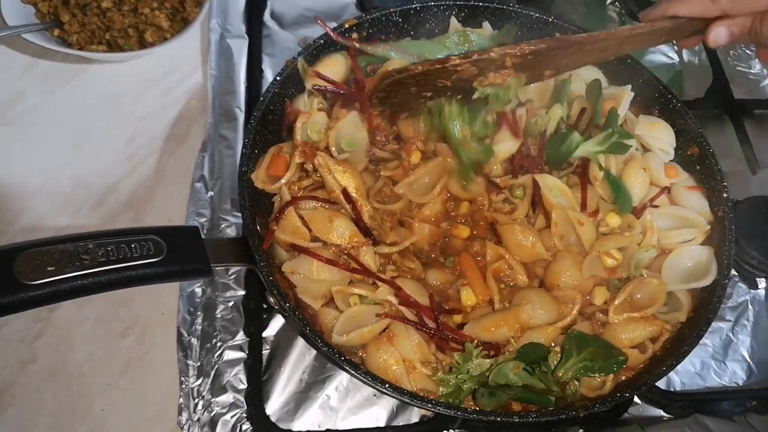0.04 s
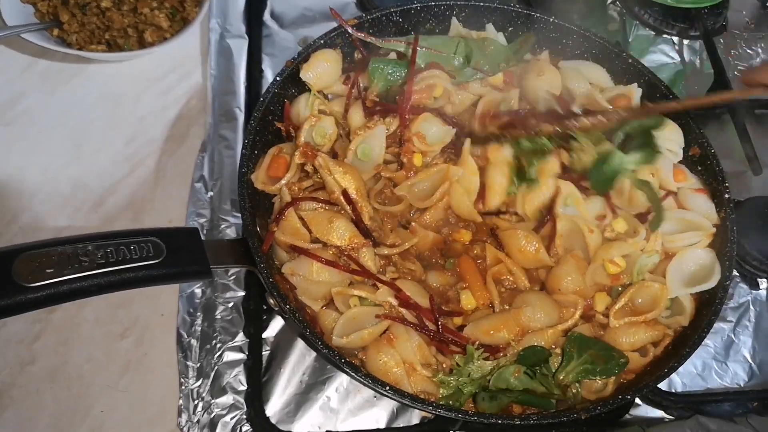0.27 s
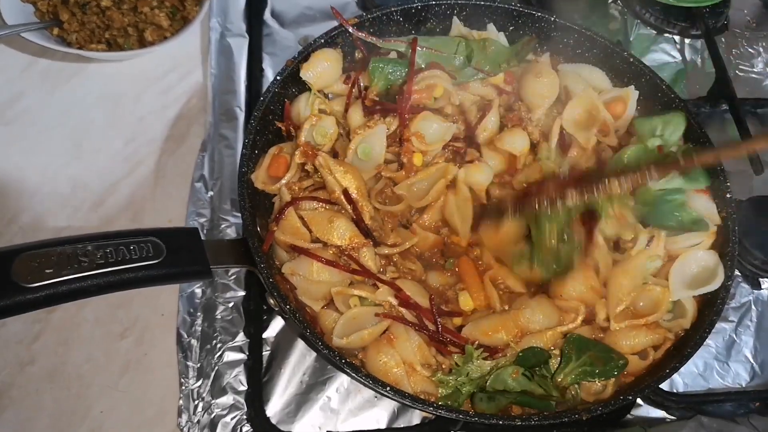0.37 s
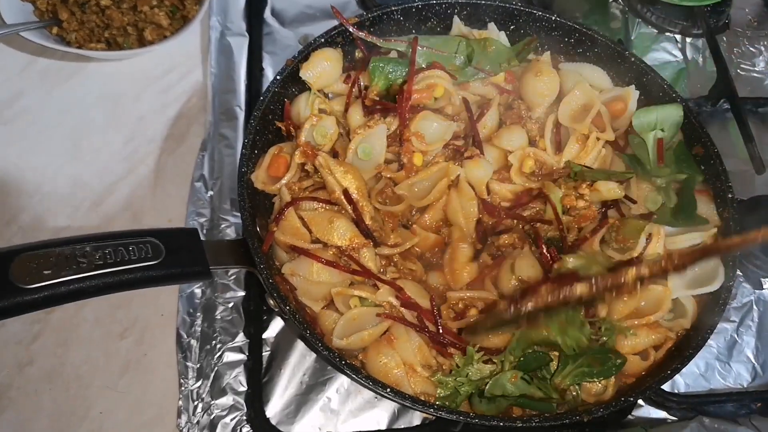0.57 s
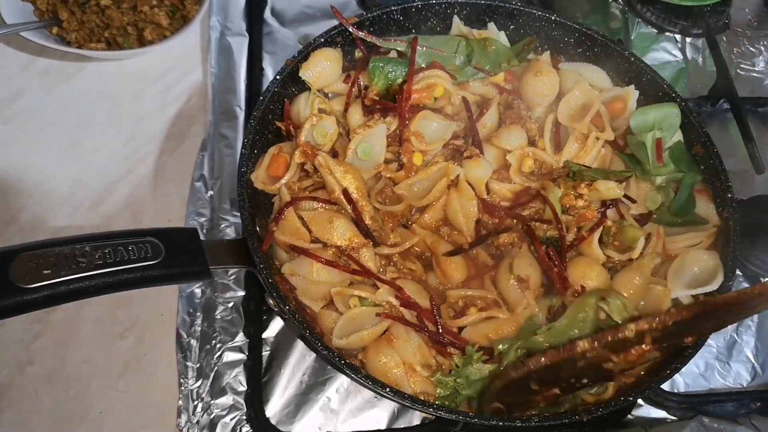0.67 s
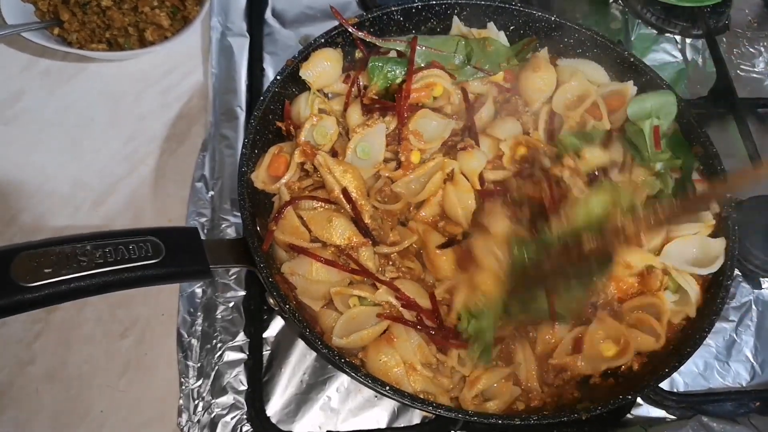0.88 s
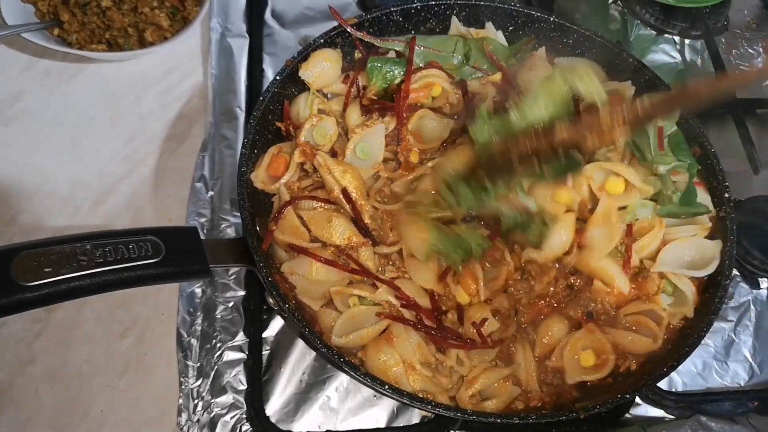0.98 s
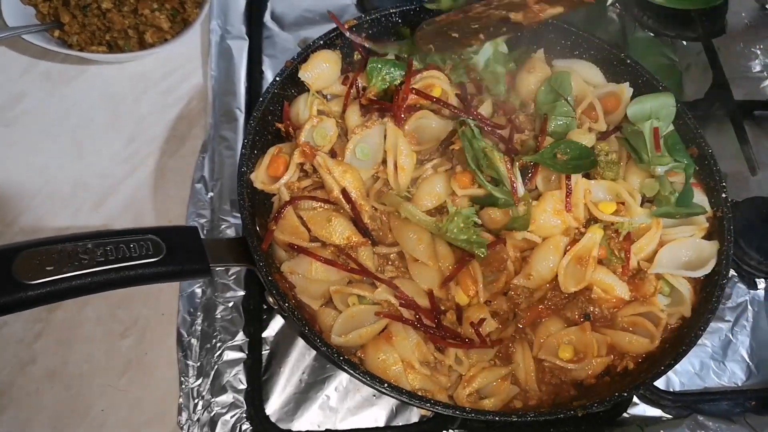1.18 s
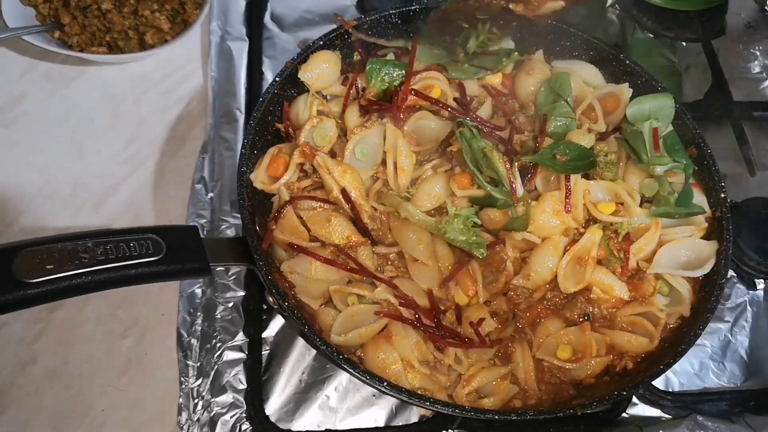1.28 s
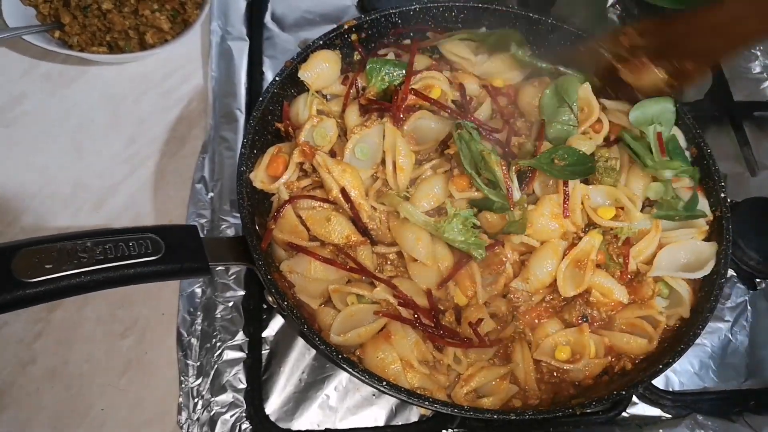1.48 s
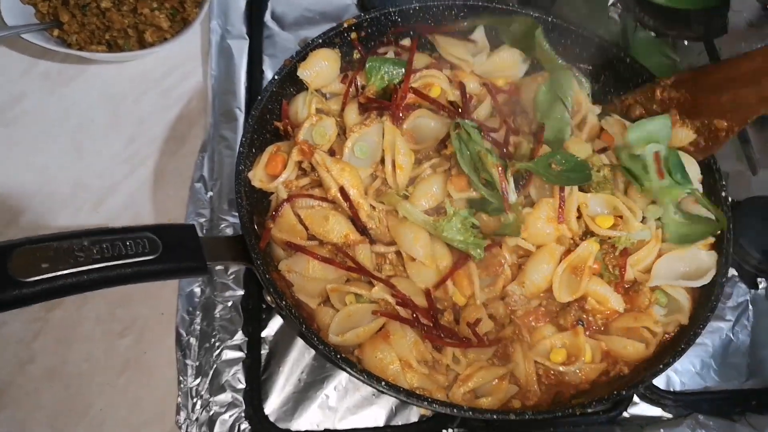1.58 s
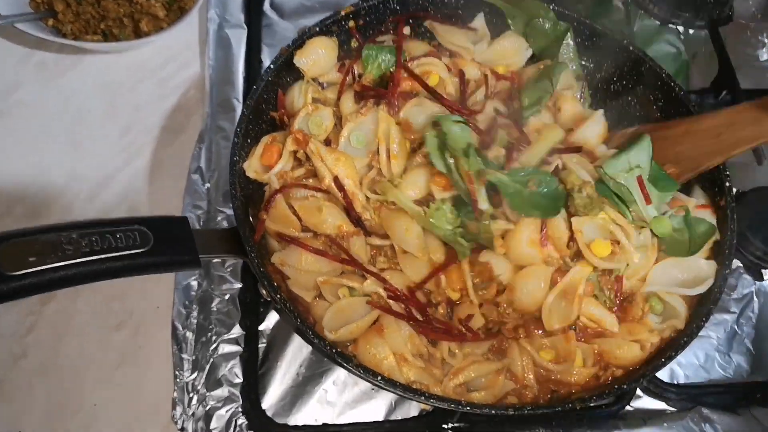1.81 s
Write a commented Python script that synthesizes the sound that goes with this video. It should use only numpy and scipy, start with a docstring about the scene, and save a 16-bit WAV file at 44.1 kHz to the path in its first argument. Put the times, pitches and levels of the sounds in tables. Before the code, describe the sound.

A wooden spoon stirs saucy pasta in a frying pan, close by. At 0.2 seconds it taps the rim and knocks sharply, the pan thudding on the stove as the sauce squelches. A duller knock at 0.6 leads into wet pops until 0.9. From 1.3 comes another squelching stroke with a knock, a light scrape and a soft rumble around 1.5. A faint hum and fan-like drone continue throughout.

```python
"""Over a mains hum and a low fan-like drone, a wooden spoon taps a frying pan and stirs saucy pasta.
It is close, in a small kitchen. The sauce squelches, pops and snaps with each stroke, the spoon
knocks the food-damped pan, and the shoved pan thuds on the stove top.
Near the end the spoon drags along the pan's wall and a soft rumble passes."""
import sys
import numpy as np
from scipy import signal
from scipy.fft import rfft, irfft, next_fast_len
from scipy.io import wavfile
from scipy.ndimage import uniform_filter1d

SR = 44100
rng = np.random.default_rng(int(sys.argv[2]) if len(sys.argv) > 2 else 0)


def digitize_waveform(pressure):
    """Quantize a signal to 16-bit integers and store it at the path in sys.argv[1].

    Rows of a 2-D input are taken as channels; values are limited to [-1, 1].
    """
    field = np.atleast_2d(pressure).T
    bounded = np.clip(field, -1, 1)
    quanta = np.round(bounded * 32767).astype(np.int16)
    wavfile.write(sys.argv[1], SR, quanta)


N = 81585
T = np.arange(N) / SR


def undb(db):
    """Decibels to gain."""
    return 10 ** (np.asarray(db) / 20)


def unit(x):
    """Scale to rms 1."""
    return x / np.sqrt(np.mean(x ** 2))


def curve(rows):
    """Gain over time from (time_s, gain_db) points."""
    return undb(np.interp(T, *np.array(rows).T))


def colour(x, points):
    """Filter by (freq_hz, gain_db) points."""
    hz, db = np.array(points).T
    size = next_fast_len(x.shape[-1] + 1024, True)
    freqs = np.maximum(np.fft.rfftfreq(size, 1 / SR), 1)
    gain = undb(np.interp(np.log(freqs), np.log(hz), db))
    return irfft(rfft(x, size) * gain, size)[..., :x.shape[-1]]


def butter(x, order, hz, kind="low"):
    """Butterworth filter."""
    return signal.sosfilt(signal.butter(order, hz, kind, fs=SR, output="sos"), x)


def noise(points, shape=N):
    """Coloured noise of rms 1."""
    return unit(colour(rng.standard_normal(shape), points))


def balance(balance_db):
    """Stereo gains; balance_db is left minus right."""
    return undb(np.array([[balance_db], [-balance_db]]) / 2)


def add(out, x, start_s, gain_db, balance_db=0):
    """Mix a mono event into stereo."""
    i = min(max(int(start_s * SR), 0), N - 1)
    out[:, i:i + len(x)] += x[:N - i] * undb(gain_db) * balance(balance_db)


def decay(t, t60_s):
    """Envelope that falls 60 dB in t60_s."""
    return np.exp(-np.log(1000) * t / t60_s)


def ring(modes, weights=None, detune=0.0071):
    """Decaying sines of a struck body, slightly detuned by the shifting load."""
    t = T[:N // 3]
    body = np.zeros(len(t))
    for k, (hz, db, t60_s) in enumerate(modes):
        gain = undb(db) * (1 if weights is None else weights[k])
        hz *= 1 + detune * rng.standard_normal()
        body += (-1) ** k * gain * np.sin(2 * np.pi * hz * t) * decay(t, t60_s)
    return body


def struck(modes, centre_hz, spread_oct):
    """Ring of peak 1 from a blow that favours the modes around centre_hz."""
    offset_oct = np.log2(np.array(modes)[:, 0] / centre_hz)
    body = ring(modes, np.exp(-.5 * (offset_oct / spread_oct) ** 2))
    return body / np.abs(body).max()


def kitchen(x, wet_db, low_t60_s=0.25, treble_t60_s=0.14, gap_s=0.00073):
    """Add a short diffuse echo, different in each ear; its treble dies first."""
    t = T[:N // 3]
    hiss = rng.standard_normal((2, len(t)))
    low = butter(hiss, 1, 3000)
    tail = (low * decay(t, low_t60_s) + (hiss - low) * decay(t, treble_t60_s)) * (t > gap_s)
    tail /= np.sqrt(np.sum(tail ** 2, axis=1, keepdims=True))
    return x + undb(wet_db) * signal.fftconvolve(x, tail, axes=1)[:, :N]


def hum(pitch_hz=99.2, rms_db=-55.5):
    """Mains hum: one steady sine."""
    return np.sqrt(2) * undb(rms_db) * np.sin(2 * np.pi * pitch_hz * T)


# Drone spectrum: freq_hz, gain_db
DRONE_SPECTRUM = [(30, -7), (60, 1), (110, 4.5), (160, -2.5), (215, -8.5), (280, 3), (350, -11.5),
                  (500, -22), (750, -36), (1500, -62), (4000, -85)]


def drone(level_db=-57.5, width=0.12):
    """Low fan-like noise, nearly mono."""
    mid, side = noise(DRONE_SPECTRUM), noise(DRONE_SPECTRUM)
    return undb(level_db) * np.array([mid + width * side, mid - width * side])


# Simmer spectrum: freq_hz, gain_db
SIMMER_SPECTRUM = [(200, 17), (700, 11.5), (1200, 8), (1900, 8), (3000, -23.5), (6000, -14), (9500, -39.5),
                   (12000, -8.5), (15500, -10)]


def simmer(gain_db=-70.5):
    """The sauce simmers: faint, wide, steady noise."""
    shared, left, right = (noise(SIMMER_SPECTRUM) for _ in range(3))
    return undb(gain_db) * (.5 * shared + np.array([left, right]))


# Push of the spoon on the food: time_s, gain_db
STIR_EFFORT = [(0, -70.5), (.07, -72.5), (.13, -65.5), (.195, -64.5), (.23, -55), (.31, -57.5), (.37, -68),
               (.45, -77), (.62, -75.5), (.685, -56), (.74, -63), (.8, -57), (.88, -57.5), (.96, -72),
               (1.04, -72.5), (1.14, -72.5), (1.21, -69), (1.3, -69), (1.335, -59.5), (1.42, -58),
               (1.5, -59), (1.57, -65.5), (1.6, -57.5), (1.66, -60.5), (1.72, -66.5), (1.85, -66.5)]
# Squelch spectrum: freq_hz, gain_db
SQUELCH_SPECTRUM = [(400, -14), (750, -20), (1200, -7), (1900, 0), (2700, -1.5), (4000, -5.5), (6200, -9.5),
                    (8000, -8), (9800, -11.5), (11500, -23), (15500, -26)]
# Squelch position by frequency: freq_hz, balance_db
SQUELCH_BALANCE = [(500, -3.5), (2200, 1), (4500, 4), (8000, 0.5), (14000, -5.5)]


def squelch(grains_per_s=2200, decay_cycles=5.4, spread_db=2.5, swing_db=15.5, smear_db=1.5, trim_db=-3.5):
    """A crowd of tiny wet grains over a soft smear, as loud as the spoon pushes."""
    smear = noise(SQUELCH_SPECTRUM, (2, N))
    when, pitch, size, side = rng.random((int(grains_per_s * N / SR), 4)).T[..., None]
    hz = 900 + 14000 * pitch ** 1.5
    samples = np.arange(160)
    cycles = samples * hz / SR
    gain = np.sqrt(hz) * undb(-spread_db * np.log(1 - .99 * size))  # many weak, few strong
    grains = gain * np.sin(2 * np.pi * cycles) * np.exp(-cycles / decay_cycles)
    index = ((when * N).astype(int) + samples).ravel()
    side_db = swing_db * (2 * side - 1)
    crowd = np.array([np.bincount(index, (grains * undb(s * side_db)).ravel(), N)[:N] for s in (1, -1)])
    texture = unit(colour(crowd, SQUELCH_SPECTRUM)) + undb(smear_db) * smear
    stirred = texture * curve(STIR_EFFORT) * undb(trim_db)
    ear_eqs = [[(freq, s * db / 2) for freq, db in SQUELCH_BALANCE] for s in (1, -1)]
    return np.array([colour(ear, eq) for ear, eq in zip(stirred, ear_eqs)])


# Light taps on the rim: start_s, peak_db, centre_hz, spread_oct, balance_db
RIM_TAPS = [(0.09, -49.5, 2264, 0.095, 15), (.161, -35.5, 1400, 1.3, 3.5), (1.793, -57.5, 1120, 0.49, 9),
            (1.8382, -55.5, 1900, 0.19, 6)]
# Rim modes: pitch_hz, gain_db, t60_s
RIM_MODES = [(1030, 3, .035), (1210, -1, 0.034), (1888, -2.5, 0.076), (2357, -7.5, 0.029),
             (2650, -2.5, 0.048)]


def taps():
    """The spoon's handle touches the rim, which rings briefly."""
    out = np.zeros((2, N))
    for start_s, peak_db, centre_hz, spread_oct, balance_db in RIM_TAPS:
        add(out, struck(RIM_MODES, centre_hz, spread_oct), start_s, peak_db, balance_db)
    return kitchen(out, wet_db=-5.5)


# Sticky films breaking: start_s, relative_db, centre_hz, balance_db
FILM_SNAPS = [(0.12, -59, 9200, -7), (0.176, -45.5, 8360, -6), (0.3, -43.5, 5440, 4), (0.326, -47, 7460, 2),
              (.404, -56.5, 7700, -6.5), (.689, -46, 5960, -2), (.8362, -48, 7240, 1),
              (0.8721, -42, 7600, 4), (1.333, -49, 8450, -8), (1.671, -48, 7600, 9), (1.7647, -45, 3450, 7),
              (1.7624, -46.5, 12000, -7)]


def snaps(decay_s=0.0033, width_oct=0.57, trim_db=-6.5):
    """Films of sauce pull apart in bright bursts of noise."""
    out, t = np.zeros((2, N)), T[:N // 40]
    for start_s, relative_db, centre_hz, balance_db in FILM_SNAPS:
        band_hz = centre_hz * 2 ** (width_oct * np.array([-.5, .5]))
        burst = unit(butter(rng.standard_normal(len(t)), 2, band_hz, "band"))
        add(out, burst * np.exp(-t / decay_s), start_s, relative_db + trim_db, balance_db)
    return out


# Pockets of sauce opening: start_s, gain_db, pitch_hz, balance_db
SAUCE_POPS = [(.1299, -42, 2040, 4), (.226, -38, 1900, 0), (0.359, -55.5, 1280, 11), (0.39, -51, 1520, 1),
              (0.6903, -55, 2600, 12), (0.7114, -46, 3080, 2), (0.7626, -36.5, 3240, 5),
              (0.7993, -34.5, 1680, -2), (0.8323, -40.5, 1800, -3), (0.849, -50, 2700, 1),
              (0.8719, -28.5, 2400, 0.5), (0.8812, -38.5, 1750, -4), (1.1045, -47, 4170, 4),
              (1.4045, -34.5, 1790, -6), (1.4627, -38, 2120, 10), (1.555, -45.5, 3000, 16),
              (1.592, -45, 2450, 4.5), (1.622, -47, 1940, 11), (1.7392, -44.5, 2310, 12),
              (1.7635, -51, 1060, 2)]


def pops(decay_cycles=2.29, glide=0.047, rise_s=0.00029, spray_db=-11.5):
    """Each small cavity rings for a few cycles, rising as it opens, with a little spray."""
    out, t = np.zeros((2, N)), T[:N // 40]
    attack = 1 - np.exp(-t / rise_s)
    for start_s, gain_db, pitch_hz, balance_db in SAUCE_POPS:
        age = t * pitch_hz / decay_cycles  # in decay times
        tone = np.sin(2 * np.pi * decay_cycles * age * (1 + glide * age / 2)) * np.exp(-age)
        spray = uniform_filter1d(rng.standard_normal(len(t)) * np.exp(-age), size=3)
        add(out, (tone + undb(spray_db) * spray) * attack, start_s, gain_db, balance_db)
    return out


# Spoon blows on the pan: start_s, gain_db, cutoff_hz, balance_db
SPOON_KNOCKS = [(.2068, -20.5, 4040, 4), (0.2435, -42.5, 1990, -15), (0.2934, -35, 1180, 1.5),
                (0.625, -30, 930, 5), (1.3742, -32, 2680, 4.5)]
# Modes of the filled pan: pitch_hz, gain_db, t60_s
PAN_MODES = [(436.8, -15.5, 0.11), (560.6, -19, 0.2), (942, -13.5, 0.035), (1086, -13, 0.051),
             (1192, -11.5, 0.068), (1332, -6, 0.052), (1625, -0.5, .028), (1742, -0.5, 0.033),
             (1844, 2, 0.031), (2302, -10.5, 0.045), (2476, -5, 0.031), (2560, -6, 0.034),
             (2872, -14, 0.02), (5620, -14, 0.015)]
# Contact crack spectrum: freq_hz, gain_db
CRACK_SPECTRUM = [(300, 2), (700, -12), (1100, -9.5), (1800, -1.5), (3200, -10), (5500, -9), (9500, -9.5),
                  (12000, -32), (16000, -41)]


def knocks(crack_db=-7.5, crack_decay_s=0.0058, echo_s=0.0064, echo_db=-8.5):
    """Wood meets the pan: a crack and a short ring, duller when food cushions the blow."""
    out = np.zeros((2, N))
    for start_s, gain_db, cutoff_hz, balance_db in SPOON_KNOCKS:
        body = ring(PAN_MODES)
        crack = noise(CRACK_SPECTRUM, len(body)) * np.exp(-T[:len(body)] / crack_decay_s)
        blow = butter(body / np.abs(body).max() + undb(crack_db) * crack, 2, cutoff_hz)
        add(out, blow, start_s, gain_db, balance_db)
        wall_echo = butter(blow, 1, 2500)
        add(out, wall_echo, start_s + echo_s, gain_db + echo_db, 0.81 * balance_db)
    return kitchen(out, wet_db=-4)


# Pan thuds on its support: start_s, peak_db, centre_hz
PAN_THUDS = [(.209, -30.5, 254), (0.2213, -24, 98), (0.2408, -27.5, 239), (0.256, -30, 66.5),
             (0.291, -41.5, 150), (.312, -35.5, 65), (0.626, -29, 196), (.645, -29, 167),
             (0.676, -34.5, 169), (0.761, -48, 148), (.8, -56, 194), (1.345, -39.5, 167),
             (1.382, -34.5, 188), (1.41, -47, 296), (1.441, -44.5, 282), (1.707, -47, 62.4)]
# Stove top modes: pitch_hz, gain_db, t60_s
STOVE_MODES = [(49, -3, 0.27), (81, -5, 0.09), (112.7, 3, .19), (158.3, 0.5, 0.12), (189.1, -3.5, 0.23),
               (226.7, -5.5, 0.13), (286, -0.5, 0.26), (334.6, -4, 0.14), (400, -9, .14)]


def thuds(rise_s=0.0012):
    """The shoved pan rocks the stove top; slower shoves wake lower modes."""
    out = np.zeros((2, N))
    for start_s, peak_db, centre_hz in PAN_THUDS:
        body = struck(STOVE_MODES, centre_hz, spread_oct=0.63)
        body *= 1 - np.exp(-T[:len(body)] / rise_s)
        add(out, body / np.abs(body).max(), start_s, peak_db)
    return kitchen(out, wet_db=-24.5)


# Spoon drag along the pan's wall: time_s, gain_db
DRAG_EFFORT = [(1.3, -92), (1.34, -68.5), (1.41, -63.5), (1.5, -69.5), (1.57, -73), (1.61, -62.5),
               (1.7, -77.5), (1.77, -71), (1.85, -88)]


def drag(slips_per_s=600, grit_db=-4, trim_db=-4):
    """Wood sticks and slips on the coating and rubs the pan's modes."""
    slips = rng.standard_normal(N) * (rng.random(N) < slips_per_s / SR)
    body = unit(signal.fftconvolve(slips, ring(PAN_MODES))[:N])
    grit = unit(butter(slips, 2, [800, 1400], "band"))
    scrape = (body + undb(grit_db) * grit) * curve(DRAG_EFFORT) * undb(trim_db)
    return kitchen(scrape * balance(6), wet_db=-1.7)


# Rumble envelope: time_s, level_db
RUMBLE_LEVEL = [(0, -63), (.5, -66.5), (.65, -54), (1, -68), (1.43, -56.5), (1.485, -40.5), (1.58, -35),
                (1.64, -55), (1.73, -48.5), (1.85, -46.5)]
# Rumble spectrum: freq_hz, gain_db
RUMBLE_SPECTRUM = [(12, -5), (26, 5.5), (38, -13), (52, -10.5), (70, -15.5), (150, -77), (400, -90)]


def rumble():
    """Deep noise, faint until it swells near the end."""
    return noise(RUMBLE_SPECTRUM) * curve(RUMBLE_LEVEL)


def scene():
    """The pan and the kitchen around it."""
    background = hum() + drone() + simmer() + rumble()
    impacts = knocks() + taps() + thuds()
    sauce = kitchen(pops() + snaps(), wet_db=-5) + squelch()
    return background + impacts + sauce + drag()


def record(dry, cutoff_hz=15750):
    """Steep low-pass on the top treble."""
    return signal.sosfilt(signal.ellip(10, .2, 70, cutoff_hz, fs=SR, output="sos"), dry)


dry = scene()
out = record(dry)
digitize_waveform(out)
```